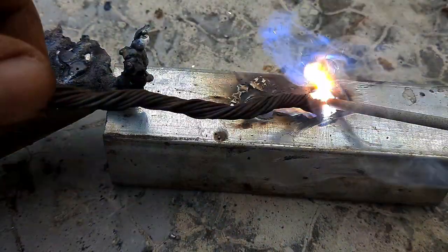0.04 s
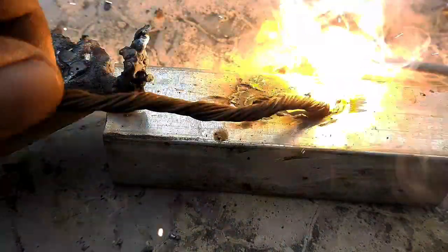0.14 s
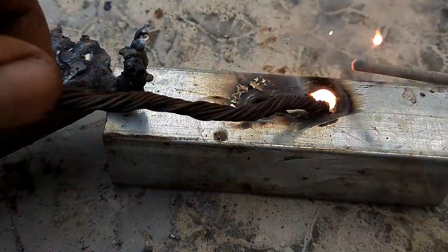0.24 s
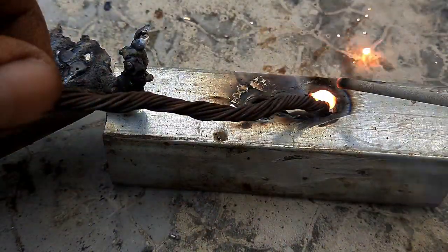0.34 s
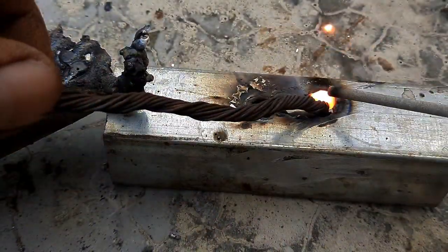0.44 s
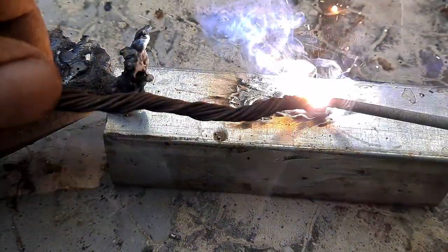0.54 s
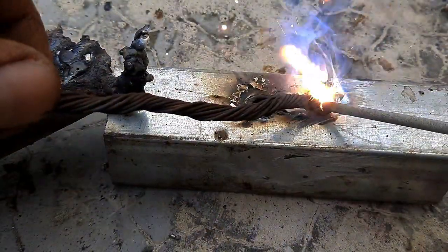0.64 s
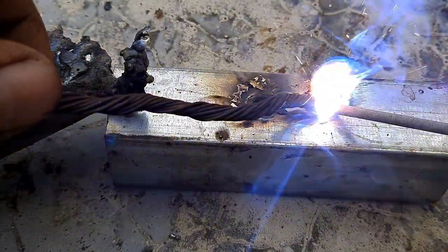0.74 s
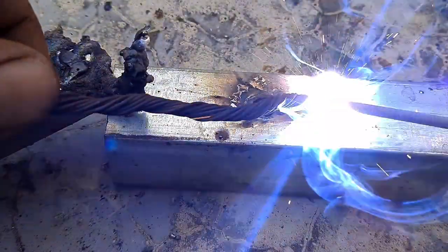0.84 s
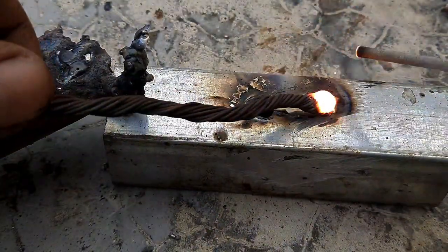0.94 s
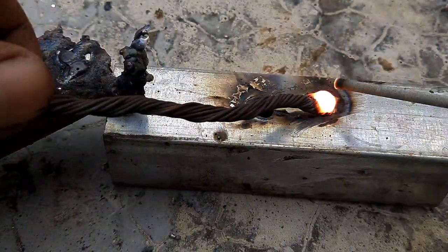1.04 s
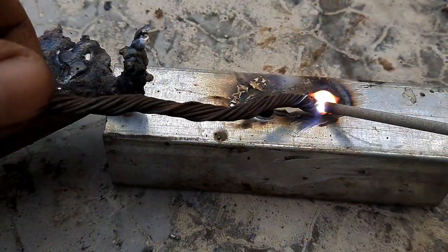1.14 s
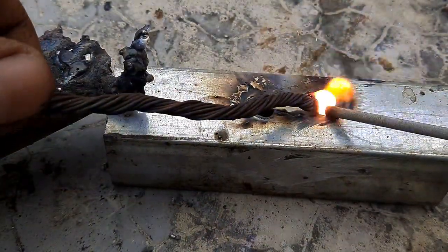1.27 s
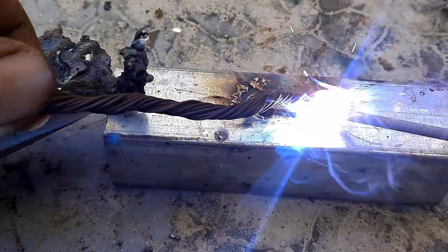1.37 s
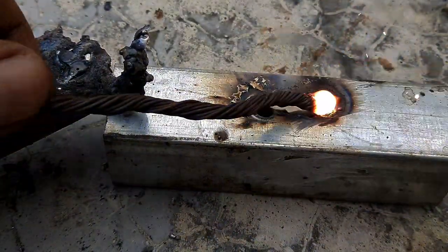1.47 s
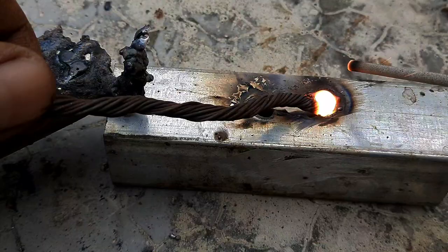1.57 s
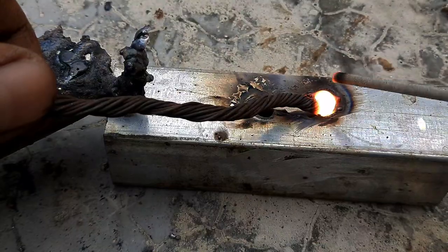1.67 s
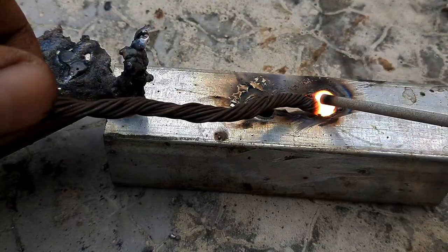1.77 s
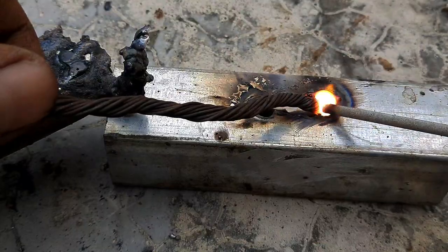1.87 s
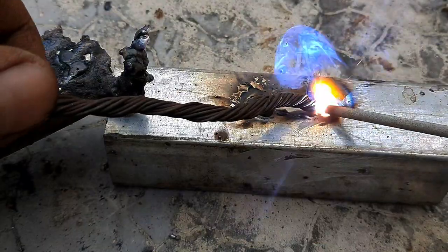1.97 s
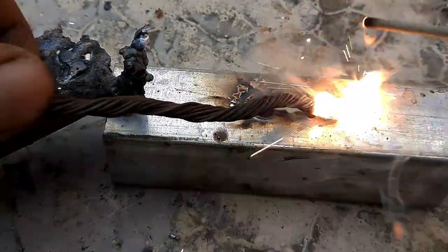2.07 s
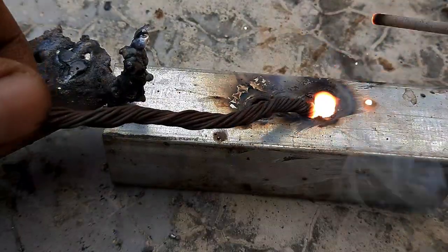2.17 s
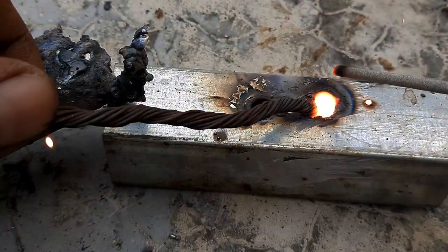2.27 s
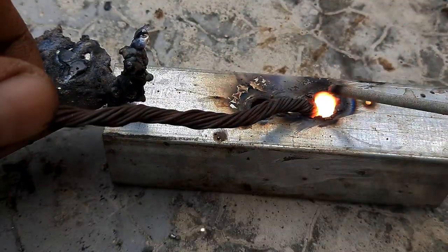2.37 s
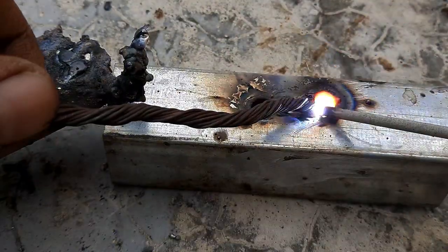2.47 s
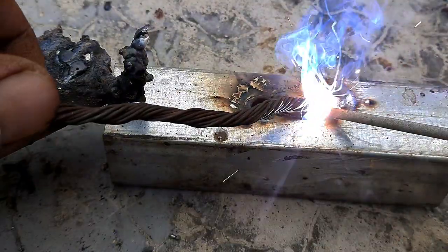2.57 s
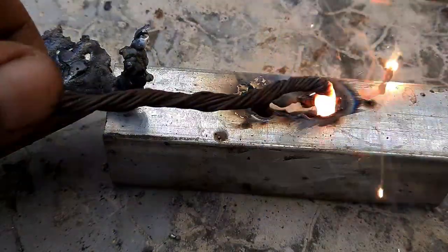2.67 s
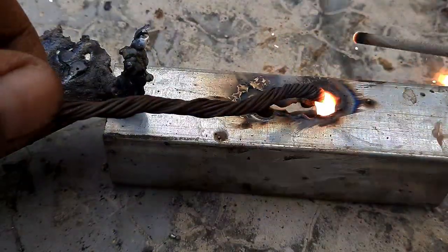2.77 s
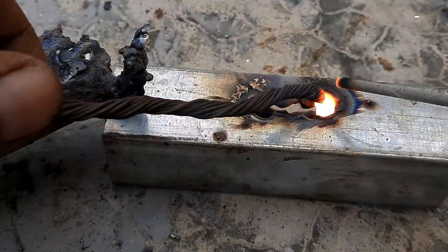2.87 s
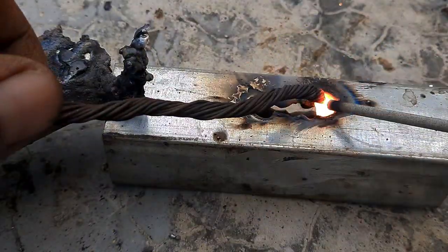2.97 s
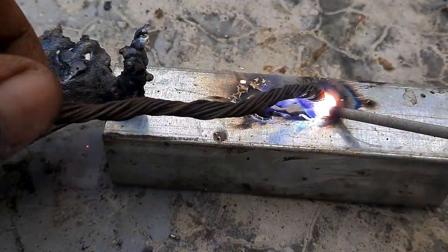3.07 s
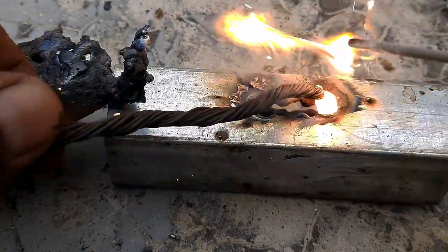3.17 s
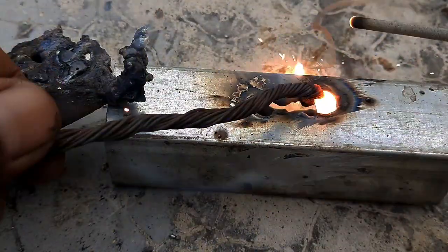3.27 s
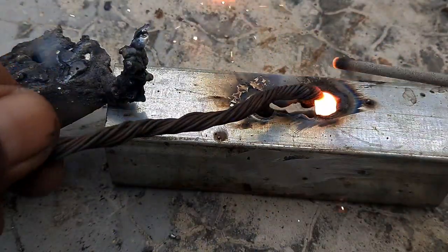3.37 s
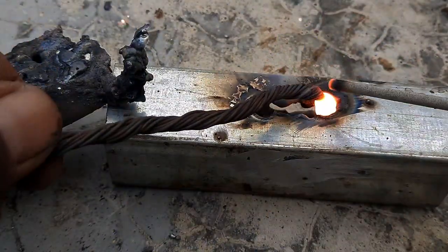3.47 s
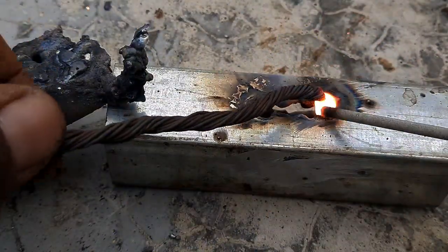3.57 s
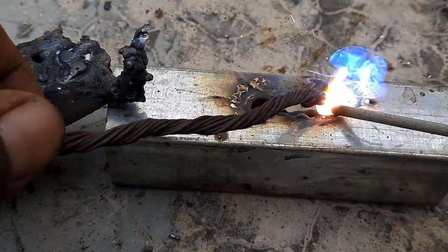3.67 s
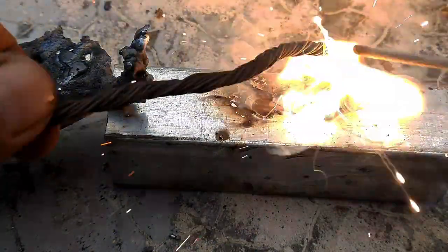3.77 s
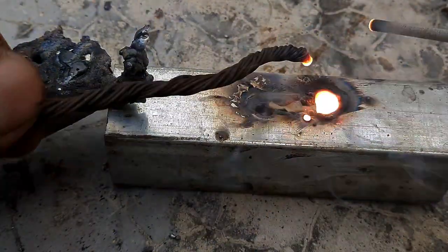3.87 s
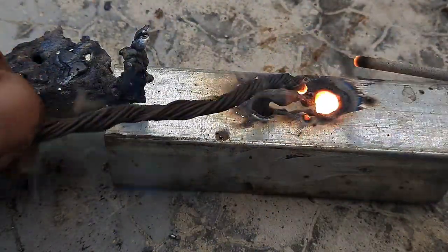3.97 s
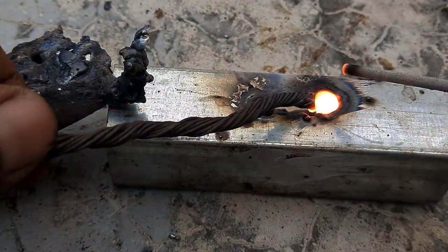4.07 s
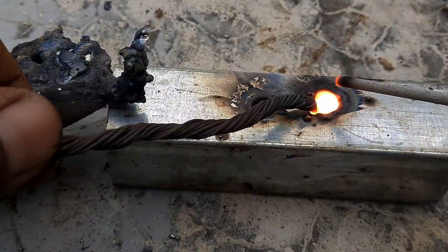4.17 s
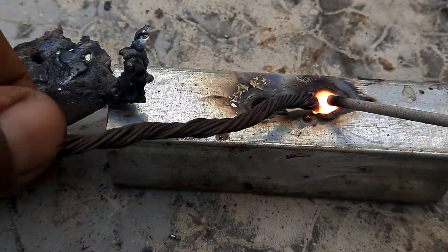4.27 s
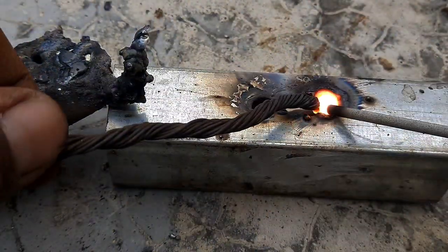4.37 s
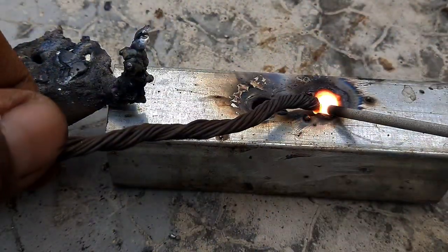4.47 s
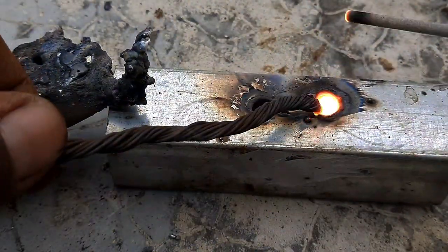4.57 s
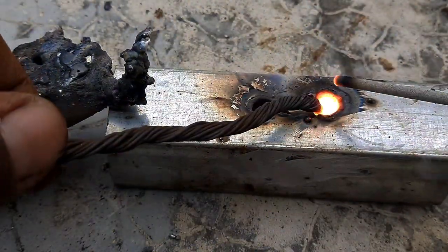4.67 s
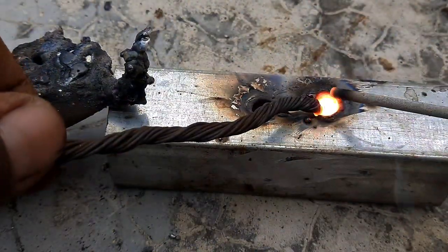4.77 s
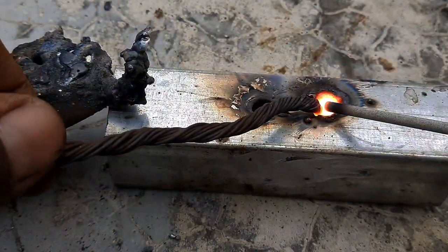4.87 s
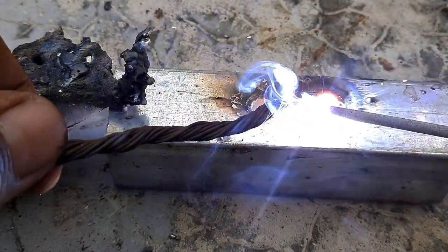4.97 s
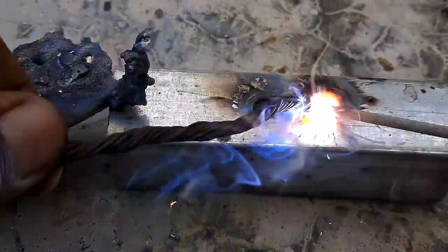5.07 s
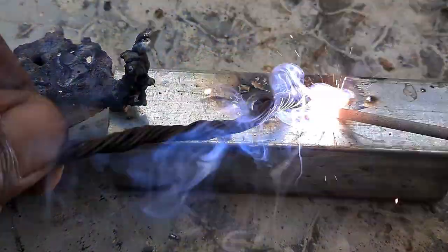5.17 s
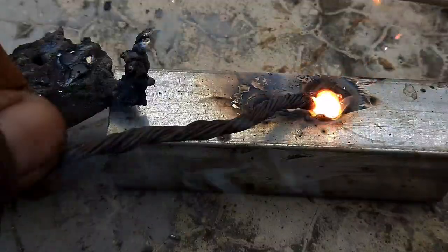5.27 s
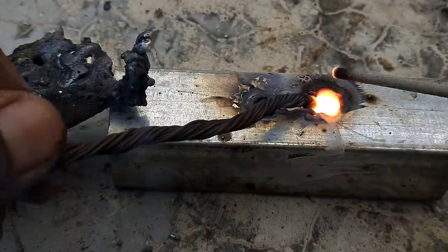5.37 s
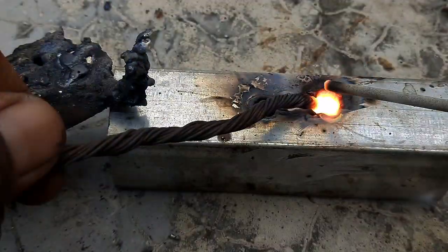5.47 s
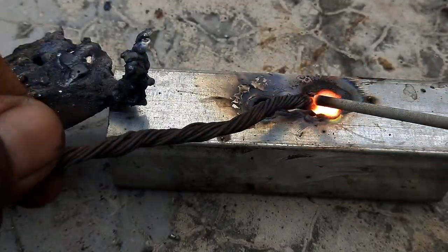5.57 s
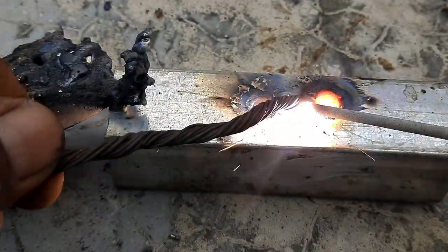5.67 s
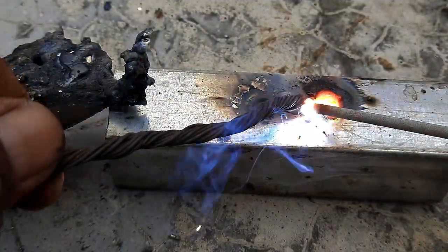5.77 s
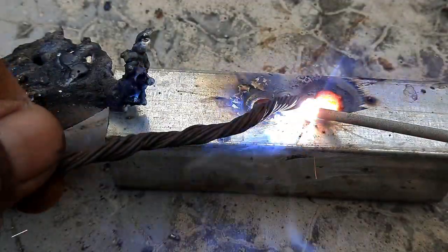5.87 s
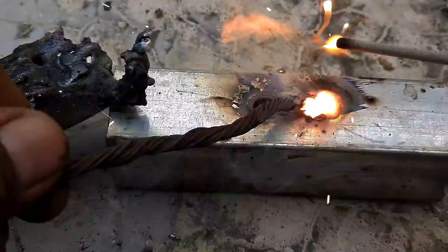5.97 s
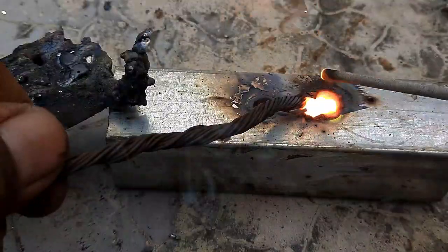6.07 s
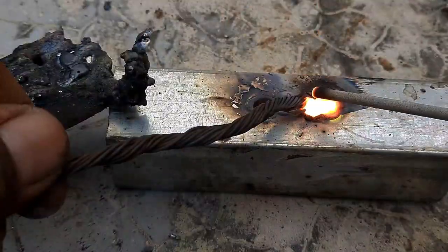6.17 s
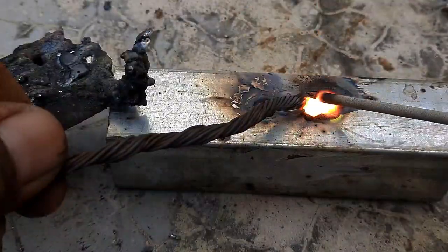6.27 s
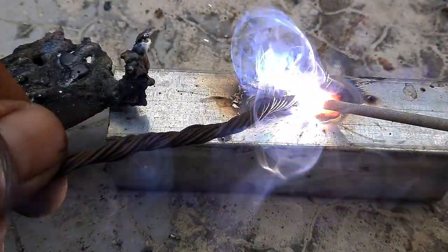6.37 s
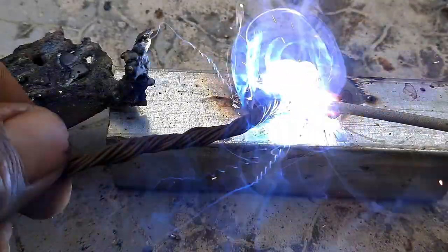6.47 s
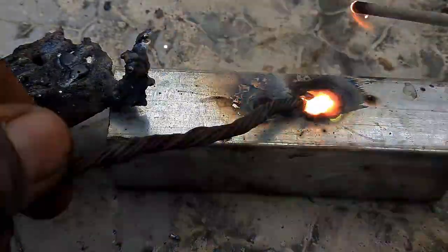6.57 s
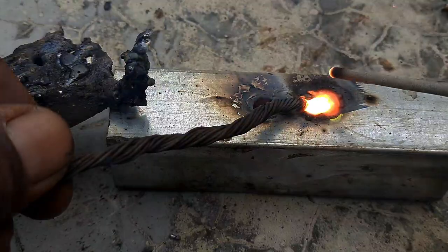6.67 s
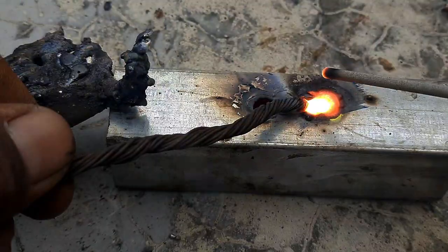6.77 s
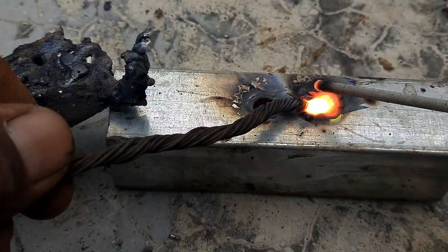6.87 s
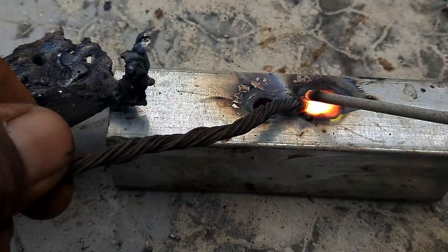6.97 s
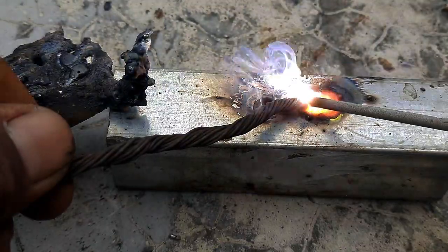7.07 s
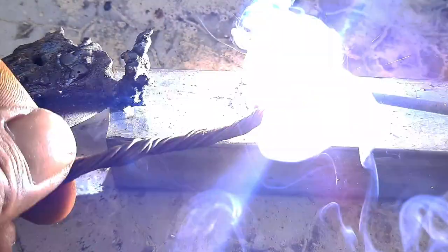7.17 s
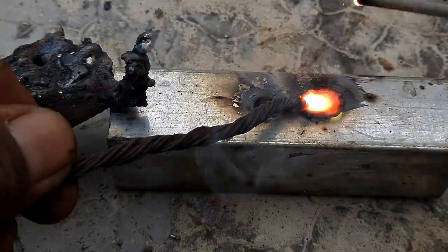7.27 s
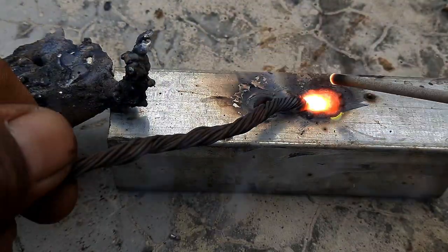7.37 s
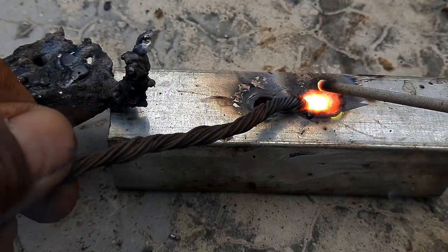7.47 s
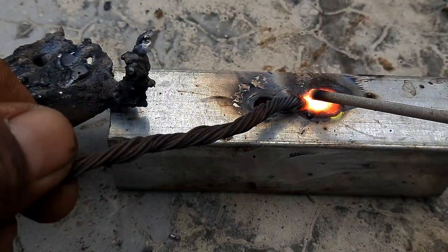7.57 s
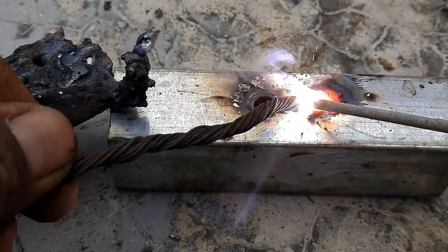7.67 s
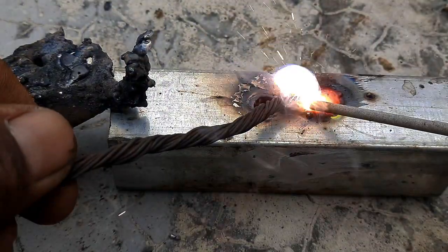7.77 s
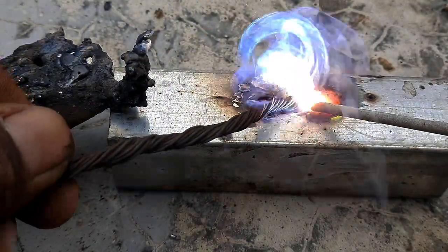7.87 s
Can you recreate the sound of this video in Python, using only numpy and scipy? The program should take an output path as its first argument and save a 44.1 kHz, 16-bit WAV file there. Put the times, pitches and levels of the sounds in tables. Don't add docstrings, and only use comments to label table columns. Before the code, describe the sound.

Close, sharp welding dabs snap, hiss and spit, each tearing off in a low gas flutter, with a droning welder fan between them.

```python
import sys
import numpy as np
from scipy import signal
from scipy.fft import rfft, irfft
from scipy.io import wavfile
from scipy.ndimage import uniform_filter1d

SR = 44100
rng = np.random.default_rng(int(sys.argv[2]) if len(sys.argv) > 2 else 0)


def volts_from_decibels(level):
    exponent = np.asarray(level, float) / 20
    return 10 ** exponent


def digitize_waveform(pressure):
    field = np.atleast_2d(pressure).T
    bounded = np.clip(field, -1, 1)
    quanta = np.round(bounded * 32767).astype(np.int16)
    wavfile.write(sys.argv[1], SR, quanta)


N = 349272
T = np.arange(N) / SR
HZ = np.fft.rfftfreq(N, 1 / SR)
DIRECT = np.array([[1], [0]])
SIDE = np.array([[1], [-1]])


def unit(x):
    return x / np.sqrt(np.mean(x ** 2))


def colour(x, points):
    hz, db = np.transpose(points)
    grid_hz = np.fft.rfftfreq(2048, 1 / SR) + 1
    log_gain = np.log(volts_from_decibels(np.interp(np.log(grid_hz), np.log(hz), db)))
    cepstrum = irfft(log_gain)
    cepstrum[1:1024] *= 2
    cepstrum[1025:] = 0
    kernel = irfft(np.exp(rfft(cepstrum)), 2048)
    kernel = kernel / np.sqrt(np.sum(kernel ** 2))
    return irfft(rfft(x) * rfft(kernel, N), N)


def band(x, hz, width_hz):
    b, a = signal.iirpeak(hz, hz / width_hz, SR)
    return signal.lfilter(b, a, x) * np.sqrt(SR / (np.pi * width_hz))


def narrow(hz, width_hz):
    slow = rng.standard_normal(len(hz)) + 1j * rng.standard_normal(len(hz))
    slow = signal.lfilter(*signal.butter(2, width_hz / 2, fs=SR), slow)
    carrier = np.exp(2j * np.pi * np.cumsum(hz) / SR)
    return unit(np.real(slow * carrier))


def walk(rate_hz):
    hold = int(SR / rate_hz)
    levels = np.repeat(rng.standard_normal(N // hold + 1), hold)
    slewed = uniform_filter1d(uniform_filter1d(levels, hold), hold)
    return unit(slewed[:N])


def impulses(s, db):
    out = np.zeros(N)
    out[(s * SR).astype(int)] = volts_from_decibels(db)
    return out


def fade(x, t60_s):
    return signal.lfilter([1], [1, -np.exp(-np.log(1000) / (t60_s * SR))], x)


def bell(s, width_s):
    out = np.zeros(N)
    near = slice(max(int((s - 4 * width_s) * SR), 0), int((s + 4 * width_s) * SR))
    out[near] = np.exp(-((T[near] - s) / width_s) ** 2)
    return out


def grainy(rate_hz, spread_db, t60_s, bed):
    hits = rng.random(N) < rate_hz / SR
    grains = hits * volts_from_decibels(spread_db * rng.exponential(size=N).clip(0, 4))
    return unit(rng.standard_normal((2, N)) * (bed + fade(grains, t60_s)))


# frequency in Hz, density in dB per Hz.
SHOP_SPECTRUM = [(25, -45), (102, -14), (223, -9.5), (416, -4), (624, -19.5), (1150, -31), (1620, -40),
                 (2550, -35.5), (3100, -47), (5600, -46), (8500, -72), (16000, -59)]


def shop():
    shop_db = -42
    mid, side = (colour(rng.standard_normal(N), SHOP_SPECTRUM) * volts_from_decibels(2.9 * walk(4.22) + 2.5 * walk(30))
                 for _ in range(2))
    side = signal.lfilter(*signal.butter(2, 800, "high", fs=SR), side)
    return volts_from_decibels(shop_db) * (mid + volts_from_decibels(6.5) * side * SIDE)


# time in seconds, level in dB.
DRONE_LEVEL = [(0, -41.5), (.2, -40), (.75, -47), (.95, -41), (1.19, -42.5), (1.45, -60), (1.78, -40),
               (2.0, -47), (2.5, -37), (2.87, -42), (3.33, -37), (4.2, -41), (4.5, -38.5), (5.25, -37.5),
               (5.7, -47.5), (6.22, -40.5), (7.4, -37), (7.78, -33)]
# frequency in Hz, width in Hz, level in dB.
HOUSING = [(430.4, 19.6, -0.5), (189, 6.4, -6.5), (326, 2.8, -18)]
# time in seconds, frequency in Hz.
WHINE_PITCH = [(0, 4810), (7.1, 4810), (7.65, 4650), (7.92, 4800)]
# time in seconds, level in dB.
WHINE_LEVEL = [(.3, -61.5), (1.1, -56.5), (1.7, -55.5), (2.3, -56), (2.9, -56.5), (3.45, -57), (4.1, -54.5),
               (4.7, -52), (5.5, -56.5), (6.2, -59.5), (6.9, -54), (7.5, -54)]


def welder():
    blade_hz = 280.3
    drone_db = np.interp(T, *np.transpose(DRONE_LEVEL))
    air_db = -47 + 0.45 * walk(3.3)
    noise = rng.standard_normal((3, N))
    phase = 2 * np.pi * np.cumsum(blade_hz + 0.5 * walk(3.0)) / SR
    tone = volts_from_decibels(drone_db - 0.5 + 1.64 * walk(12)) * np.sqrt(2) * np.sin(phase)
    drone = tone + volts_from_decibels(drone_db - 8.5) * band(noise[0], blade_hz, 26)
    air, air_side = (sum(volts_from_decibels(db) * band(v, hz, width_hz) for hz, width_hz, db in HOUSING)
                     for v in noise[1:])
    hum = drone + volts_from_decibels(air_db - 1.5) * (air + volts_from_decibels(-18) * SIDE * air_side)
    whine_db = np.interp(T, *np.transpose(WHINE_LEVEL)) + 0.93 * walk(17)
    whine = volts_from_decibels(whine_db) * narrow(np.interp(T, *np.transpose(WHINE_PITCH)), 110)
    return hum * volts_from_decibels(-0.4 * SIDE) + np.array([volts_from_decibels(-3) * np.roll(whine, -3), volts_from_decibels(3) * whine])


# start in seconds, level in dB, first half turn in seconds, length in seconds.
DRAUGHT_PUFFS = [
    (5.735, -10.5, 0.0022, 0.013),
]


def draught():
    out = np.zeros(N)
    for s, db, turn_s, length_s in DRAUGHT_PUFFS:
        t = (T - s).clip(0)
        swing = np.cos(np.pi * (t / turn_s) ** 0.56)
        out += volts_from_decibels(db) * (t > 0) * swing * np.exp(-t / length_s)
    return np.array([out, volts_from_decibels(-37) * out])


# sizzle in dB at tear-off, sizzle in dB at the next strike.
POOL_LEVELS = [(-85, -62), (-42, -70.5), (-43, -91), (-44.5, -81), (-56, -62), (-45, -58.5), (-42, -85),
               (-75, -68), (-47, -83), (-71, -61), (-43, -85), (-45, -79), (-44, -88), (-44.5, -76)]
# frequency in Hz, density in dB per Hz.
SIZZLE_SPECTRUM = [(1470, -4), (2500, 2), (3650, 0.5), (7150, 2.5), (9570, -4), (13700, -2.5),
                   (15900, -5.5), (16500, -16)]


def pool():
    sizzle_db = np.full(N, -120.0)
    for dab, after, (hot_db, cool_db) in zip(DABS, DABS[1:], POOL_LEVELS):
        tear, strike = dab[1], after[0]
        age = ((T - tear) / (strike - tear)).clip(0, 1)
        cooled = age ** 0.66
        sizzle_db = np.where(T >= tear, hot_db + (cool_db - hot_db) * cooled, sizzle_db)
    level = volts_from_decibels(sizzle_db + 0.63 * walk(25.07) + 2.0)
    return level * colour(grainy(170, 4.8, 0.016, 1.9), SIZZLE_SPECTRUM)


# start in seconds, length in seconds, frequency in Hz, width in Hz, level in dB.
SLAG_NOTES = [(3.982, 0.12, 11800, 7000, -43.5), (4.247, 0.042, 11000, 12000, -48),
              (2.759, 0.024, 6100, 13000, -36), (6.158, .03, 1010, 300, -50), (3.27, .2, 1600, 2000, -50),
              (1.48, .11, 5600, 1000, -55), (5.68, .04, 9000, 12000, -55), (6.16, .04, 2100, 200, -59),
              (3.36, .04, 2250, 200, -53), (6.81, .1, 2300, 900, -58), (7.37, .05, 1700, 1200, -56),
              (.513, .014, 5250, 400, -40), (.92, .23, 6100, 180, -54), (3.85, .1, 5080, 200, -50),
              (5.265, .2, 5300, 350, -51), (6.022, .17, 5340, 300, -51), (6.585, 0.21, 5330, 400, -50),
              (7.276, 0.28, 5430, 350, -53)]
# start in seconds, length in seconds, frequency in Hz, level in dB.
STEEL_NOTES = [
    (2.141, .27, 2940, -59),
    (3.857, .057, 3000, -53),
    (5.29, .2, 2965, -55),
    (6.158, .062, 3270, -58),
    (6.757, .22, 2940, -56),
]
# start in seconds, level in dB, start in Hz, share by which the pitch sinks.
SQUEAK_NOTES = [
    (4.46, -55, 4640, .17),
    (4.745, -56, 4150, -.12),
    (6.73, -56, 4640, .17),
    (7.43, -53, 4640, .17),
]


def singing():
    slag_sag, steel_width_hz, squeak_s, squeak_width_hz = 0.014, 90, 0.032, 130
    notes = [(*row, slag_sag) for row in SLAG_NOTES]
    notes += [(s, length_s, hz, steel_width_hz, db, 0) for s, length_s, hz, db in STEEL_NOTES]
    notes += [(s, squeak_s, hz, squeak_width_hz, db, sag) for s, db, hz, sag in SQUEAK_NOTES]
    out, flutter = np.zeros(N + SR), walk(37)
    for s, length_s, hz, width_hz, db, sag in notes:
        start = int(s * SR)
        age = (np.linspace(0, 1, SR // 3) / 3 / length_s).clip(0, 1)
        note = narrow(hz * (1 - sag * age), width_hz)
        swell = np.sin(np.pi * age ** 0.4).clip(0) ** 0.7
        level = volts_from_decibels(db - 4.5 + 1.5 * np.roll(flutter, -start)[:len(age)])
        out[start:][:len(age)] += level * note * swell
    return out[:N]


# centre in seconds, width in seconds, level in dB.
GAS_PUFFS = [(0.173, 0.0048, -26.5), (0.539, 0.0049, -28), (0.571, 0.0084, -22.5), (0.741, 0.057, -36),
             (0.898, 0.02, -24.5), (1.463, 0.014, -25), (1.938, 0.035, -37), (2.104, 0.016, -29),
             (2.702, 0.034, -24), (3.214, 0.018, -25), (3.82, 0.0095, -24), (4.544, 0.013, -22.5),
             (4.604, 0.031, -35), (5.044, 0.07, -34), (5.264, 0.031, -27.5), (5.743, 0.014, -43),
             (6.008, 0.021, -22), (6.578, 0.032, -41), (7.237, 0.03, -17), (7.746, 0.057, -37)]


def puffs():
    rumble = band(band(rng.standard_normal(N), 143, 133), 203, 285)
    out = np.zeros(N)
    for s, width_s, db in GAS_PUFFS:
        swell = np.exp(-2 * ((T - s) / (0.63 * width_s)) ** 2)
        flap = swell * rumble
        out += volts_from_decibels(db - 2.0) * flap / np.sqrt(np.sum(flap ** 2) / np.sum(swell ** 2))
    return out


# centre in seconds, level in dB.
GAS_THUMPS = [
    (.904, -40),
    (1.463, -35),
    (2.702, -35),
    (3.821, -28),
    (6.58, -28),
    (7.251, -47),
]


def thumps():
    thump_hz, width_s = 85, 0.0062
    return sum(-volts_from_decibels(db) * bell(s, width_s) * np.sin(2 * np.pi * thump_hz * (T - s))
               for s, db in GAS_THUMPS)


# start in seconds, peak in dB.
BRIGHT_SPARKS = [(0.0024, -16), (0.033, -20), (0.0504, -22), (0.1264, -15.5), (0.2528, -47), (0.3531, -41),
                 (0.391, -49), (0.5831, -23), (0.63, -14), (0.6452, -15.5), (0.6624, -19), (0.677, -17),
                 (0.7048, -28), (1.1049, -43), (1.2144, -30), (1.2218, -15), (1.2446, -29), (1.291, -19),
                 (1.3184, -23), (1.3837, -18), (1.431, -14), (1.6641, -56), (1.702, -53), (1.76, -41),
                 (1.7968, -53), (2.144, -33), (2.2794, -47), (2.404, -43), (2.5697, -12), (2.585, -17),
                 (2.6269, -12), (2.64, -13), (2.9841, -46), (3.1442, -12), (3.5423, -46), (3.587, -34),
                 (3.6711, -20), (3.9205, -46), (3.9304, -51), (4.1144, -52), (5.0414, -29), (5.055, -24),
                 (5.1176, -23), (5.1554, -18), (5.7212, -18), (5.929, -21), (5.9404, -20), (5.9554, -20),
                 (6.1115, -47), (6.3866, -27), (6.4037, -21.5), (6.451, -21), (6.6283, -48), (6.7834, -53),
                 (7.1137, -24), (7.6261, -48.5), (7.723, -20), (7.7543, -22), (7.872, -24)]
# start in seconds, peak in dB.
DULL_KNOCKS = [(0.0044, -26.5), (0.081, -25.5), (0.188, -32), (0.676, -29), (0.7256, -30), (0.762, -32),
               (0.7797, -23.5), (0.837, -35), (1.357, -27.5), (1.906, -29), (2.692, -17), (2.763, -39),
               (2.776, -46), (3.1033, -32), (3.214, -15.5), (3.3004, -34), (3.309, -36), (3.3707, -51),
               (3.3705, -32.5), (3.4382, -33), (3.7, -35), (3.7473, -22.5), (5.042, -22), (5.721, -26.5),
               (5.8483, -27.5), (5.886, -24), (6.0042, -20), (6.3426, -37), (6.4123, -38), (6.4474, -31),
               (6.8582, -38.5), (7.1335, -24), (7.793, -28), (7.81, -32), (7.8975, -34)]


def sparks():
    spit = impulses(*np.transpose(BRIGHT_SPARKS))
    knock = impulses(*np.transpose(DULL_KNOCKS))
    spray = uniform_filter1d(fade(spit, 0.0097) + volts_from_decibels(-8) * fade(spit, 0.03), size=24)
    thin = rng.standard_normal((2, N)) * spray + 3.5 * spit * DIRECT
    dull = rng.standard_normal((2, N)) * fade(knock, 0.014) + volts_from_decibels(4) * knock * DIRECT
    treble = signal.butter(2, 8500, "high", fs=SR, output="sos")
    return volts_from_decibels(-1.5) * signal.sosfilt(treble, thin) + volts_from_decibels(-2) * band(dull, 1350, 1200)


# peak in dB, body over crack in dB.
ROD_STRIKES = [(-36, -1), (-12, 14), (-26, -32), (-24.5, -6), (-19, -8), (-28, 5), (-29, 0), (-45, -10),
               (-18, 4), (-32, -26), (-40, -8), (-26, -10), (-16, 9), (-10, 3), (-23.5, 19)]
# start in seconds, peak in dB, body over crack in dB.
SHORT_CIRCUITS = [(0.0333, -25, -1), (0.0685, -31, -3), (0.1277, -27, 5), (0.1702, -20.5, 14.5),
                  (0.735, -26, 3), (0.7942, -20, -11), (0.8977, -18, 7.5), (1.1931, -17, -6),
                  (1.3189, -15.5, 0.5), (1.386, -28, -10), (1.917, -18.5, -5.5), (1.949, -20, -23),
                  (2.0492, -13, 1), (2.106, -16.5, 11.5), (2.563, -23, -2), (2.6403, -35, -10),
                  (3.203, -18, -11), (3.684, -6.5, -7.5), (3.7014, -9.5, -23), (3.8205, -26, 15),
                  (4.3709, -9, -3.5), (5.118, -18, -5), (5.9297, -23.5, -3), (6.387, -22, -4),
                  (7.1566, -21.5, 0), (7.1717, -18, 1), (7.184, -17, -4), (7.2068, -13.5, -12),
                  (7.2261, -25, 18), (7.241, -22, -16)]
# start in seconds, peak in dB.
SMALL_SPITS = [(.5974, -17), (0.6214, -14.5), (0.6455, -23), (0.681, -20), (.7062, -25), (1.223, -18),
               (1.272, -25), (1.3106, -25), (1.3665, -18.5), (1.87, -23), (1.879, -23), (2.07, -14),
               (2.57, -24), (2.5867, -29), (3.137, -20), (3.1452, -23), (3.6332, -19), (3.6497, -22),
               (3.7232, -18), (4.379, -18), (4.8217, -20), (4.8292, -16), (5.0429, -10), (5.111, -21),
               (5.156, -22), (5.781, -19), (6.4913, -30), (7.809, -23.5), (7.8736, -19), (7.88, -19),
               (1.432, -16.5), (0.7092, -25), (.8395, -36), (5.789, -22),
               (0.0002, -32), (0.0076, -29), (0.0337, -25), (0.0706, -24), (0.1707, -10.5), (0.534, -31),
            (0.6306, -27), (0.6487, -31), (0.6627, -28), (0.7072, -26), (0.7095, -27), (0.7361, -24),
            (0.7388, -25), (1.1791, -23), (1.2961, -29), (1.3675, -16), (1.3713, -27), (1.8714, -24),
            (1.8813, -27), (2.0452, -19), (2.5305, -23), (2.5865, -24), (2.6833, -16), (3.065, -23),
            (3.1168, -33), (3.1485, -24), (3.154, -22), (3.632, -26), (3.779, -15), (3.7862, -14),
            (4.96, -23), (4.9712, -25), (4.9827, -25), (5.048, -24), (5.056, -23), (5.151, -23),
            (5.1634, -23), (5.2623, -18), (5.7817, -27), (5.9448, -27), (6.4902, -17), (6.5172, -27),
            (6.534, -19), (6.558, -27), (7.1149, -32), (7.1509, -20), (7.172, -21), (7.236, -24),
            (7.2466, -21), (7.7003, -32), (7.7554, -24), (7.789, -23), (7.8063, -33), (7.8476, -24),
            (7.8853, -25), (7.8985, -19.5)]


def droplets():
    strikes = [(dab[0], *row) for dab, row in zip(DABS, ROD_STRIKES)]
    small = [(s, db, -8.5) for s, db in SMALL_SPITS]
    return np.transpose(strikes + SHORT_CIRCUITS + small)


def mottle(x, low_db, high_db):
    low = signal.lfilter(*signal.butter(1, 7000, fs=SR), x)
    return volts_from_decibels(low_db) * low + volts_from_decibels(high_db) * (x - low)


# frequency in Hz, density in dB per Hz.
HISS_SPECTRUM = [(590, -17), (1000, -6.5), (1610, -6), (1820, 1), (2090, -13), (2280, -4), (2620, -6),
                 (2980, -4.5), (5250, 0.5), (8550, -2), (9720, -8), (12100, -3), (15300, -6)]
# start in seconds, peak in dB.
SLAG_TICKS = [(.222, -34), (.308, -35), (2.431, -34.5), (2.8834, -32.5), (3.372, -35), (3.4375, -33),
              (3.5984, -31), (7.666, -26), (0.33, -40), (0.4145, -40), (1.115, -40), (1.767, -35.5),
              (2.495, -33), (2.927, -33), (3.003, -36), (3.3, -31), (3.49, -33), (5.6478, -40),
              (6.7054, -49), (6.7196, -43), (6.736, -41), (6.771, -45), (6.808, -42), (6.8453, -45),
              (6.8628, -49), (6.8802, -37), (6.9082, -42), (6.9287, -44), (6.9551, -43), (7.5352, -41)]


def snaps():
    s, db, body_db = droplets()
    crack, body = impulses(s, db), impulses(s, db + body_db)
    tick = impulses(*np.transpose(SLAG_TICKS))
    shock = 9 * (crack - 0.55 * np.roll(crack, 2)) * DIRECT
    crack_spray = volts_from_decibels(-13) * fade(crack, 0.0018) + volts_from_decibels(-15.5) * fade(crack, 0.018)
    spray = uniform_filter1d(crack_spray + volts_from_decibels(-1.5) * fade(tick, 0.016), size=12)
    high = colour(shock + rng.standard_normal((2, N)) * spray, HISS_SPECTRUM)
    low = rng.standard_normal((2, N)) * volts_from_decibels(0.5) * fade(body, 0.0064) + volts_from_decibels(7.5) * body * DIRECT
    knock = band(low, 1200, 2000) + volts_from_decibels(-5.5) * band(low, 530, 370)
    return volts_from_decibels(-4) * mottle(high, 1 + walk(70), walk(70) - 3) + volts_from_decibels(-6.5) * knock


# strike in seconds, tear-off in seconds, hiss in dB once struck,
# hiss in dB before tearing off, roar in dB at tear-off.
DABS = [(0, 0.182, -35, -31.5, -32), (0.5328, 0.899, -22, -28, -21), (1.1785, 1.456, -37, -29, -25.5),
        (1.864, 2.103, -33.5, -29.5, -22.5), (2.5266, 2.695, -44, -26, -22.5),
        (3.0628, 3.211, -34, -30.5, -24), (3.623, 3.814, -32, -27, -17.5), (4.365, 4.393, -38, -48, -50),
        (4.5322, 4.545, -52, -39.5, -29.5), (4.824, 4.826, -43, -36.5, -52),
        (4.947, 5.258, -22.5, -29.5, -19.5), (5.725, 6.009, -36.5, -32.5, -24.5),
        (6.3353, 6.564, -37, -28.5, -24.5), (7.058, 7.244, -28.5, -31.5, -16),
        (7.686, 7.965, -32, -34, -39)]
# centre in seconds, width in seconds, hiss change in dB.
HAND_WAVERS = [(0.177, 0.005, -37), (.66, 0.15, -8), (0.692, 0.007, -6), (.794, 0.0098, 2.5),
               (1.206, 0.016, -7.5), (1.246, 0.0084, 2.5), (1.898, 0.011, -9.5), (1.94, 0.035, -3),
               (1.985, 0.0074, -10), (2.541, 0.0097, 4), (2.615, 0.016, 8), (3.678, 0.024, -6.5),
               (3.735, 0.015, -1), (4.947, 0.0047, -10), (4.989, 0.0055, -8), (5.039, 0.0052, -8),
               (5.061, 0.017, 7.5), (5.925, 0.0037, 2), (6.545, 0.024, 1), (2.6, .006, -2),
               (0.859, 0.0091, -3.5), (1.45, 0.009, -0.5), (5.102, 0.072, -2.5), (5.178, 0.0086, 3.5),
               (5.757, 0.014, -6), (5.785, 0.012, 3.5), (5.906, 0.011, -4.5), (5.94, 0.049, 2.5),
               (6.409, 0.015, 3.5), (6.435, 0.013, -4.5), (6.458, 0.047, 6), (7.174, 0.0053, 4.5),
               (7.736, 0.0042, -10), (7.75, 0.0078, -5), (7.774, 0.013, -5), (7.795, 0.057, 6)]


def burning():
    flash_db, flash_s = 5.5, 0.0061
    stretch_db, stretch_s = 7.5, 0.046
    swell_db_per_s, hiss_quench_db_per_s, roar_quench_db_per_s = 485, 1120, 1302
    hiss_db, roar_db = np.full((2, N), -120.0)
    waver_db = sum(db * bell(s, width_s) for s, width_s, db in HAND_WAVERS)
    for strike, tear, early_db, late_db, tear_db in DABS:
        since, left = T - strike, tear - T
        build = (since / (tear - strike)).clip(0, 1)
        steady = early_db + (late_db - early_db) * build + waver_db
        flash = flash_db * np.exp(-since.clip(0) / flash_s)
        stretch = stretch_db * np.exp(-left.clip(0) / stretch_s)
        roar = np.maximum(steady - 11.5, tear_db - swell_db_per_s * left.clip(0))
        overrun = left.clip(None, 0)
        hiss = steady + flash + stretch + hiss_quench_db_per_s * overrun
        hiss_db = np.where(since >= 0, hiss, hiss_db)
        roar_db = np.where(since >= 0, roar + roar_quench_db_per_s * overrun, roar_db)
    return hiss_db.clip(-120), roar_db.clip(-120)


# treble over middle in dB once struck, before tearing off.
DAB_SHEEN = [(2, -1.5), (2.5, -0.5), (8, -1), (6.5, -1.5), (6, -0.68), (7, 3.3), (5.5, -1.7), (-3, -0.36),
             (22, -1.5), (13, 9), (0, 1.8), (-1.5, -0.7), (-2, -0.5), (-2, -0.5), (-0.5, 5)]


def sheen():
    s = [t for dab in DABS for t in dab[:2]]
    return np.interp(T, s, np.ravel(DAB_SHEEN))


# frequency in Hz, width in Hz, swing in dB.
COLOUR_DIPS = [(2600, 1000, 4), (7400, 1200, 5), (9600, 1200, 4)]


def dance(x):
    for hz, width_hz, db in COLOUR_DIPS:
        change = volts_from_decibels(db * walk(18) - db / 2) - 1
        x = x + change * signal.lfilter(*signal.iirpeak(hz, hz / width_hz, SR), x)
    return x


# frequency in Hz, density in dB per Hz.
ROAR_SPECTRUM = [(150, -15.5), (250, -6.5), (679, 1), (834, -7), (1190, -1), (1860, -16), (2100, -24),
                 (2600, -16), (3380, -27), (5720, -120)]
# centre in seconds, width in seconds, roar in dB.
GAS_FLARES = [(.56, .015, -31), (0.186, 0.0024, -25), (.74, .04, -73), (2.095, 0.013, -47),
              (2.69, 0.015, -22.5), (.172, 0.0056, -24), (3.211, 0.013, -24), (4.375, 0.0055, -59),
              (7.69, 0.0051, -36), (1.369, 0.019, -65), (1.937, 0.0069, -26.5), (3.075, 0.025, -44),
              (4.534, 0.011, -39), (4.821, 0.0041, -28), (4.95, 0.015, -42), (5.015, 0.012, -32),
              (5.057, 0.021, -26), (5.785, 0.029, -48), (5.884, 0.017, -36.5), (6.36, 0.3, -48),
              (7.075, 0.049, -37), (7.705, 0.0063, -36)]


def arc():
    hiss_db, roar_db = burning()
    flares = sum(volts_from_decibels(db) * bell(s, width_s) for s, width_s, db in GAS_FLARES)
    gas = volts_from_decibels(roar_db) + (hiss_db > -70) * flares
    spit = grainy(500, 1.6, 0.0025, 0.9) + volts_from_decibels(-19) * grainy(90, 1.5, 0.0012, 0)
    plasma = dance(colour(spit, HISS_SPECTRUM))
    hiss = mottle(plasma, 1.6 * walk(50) - sheen(), 1.6 * walk(50) + sheen())
    roar = colour(grainy(200, 3.6, 0.0065, 0.58), ROAR_SPECTRUM)
    return hiss * volts_from_decibels(hiss_db - 2.0 + 1.55 * walk(120)) + roar * gas * volts_from_decibels(-3.5 + 2.9 * walk(80))


# frequency in Hz, left lead in radians before,
# after, left minus right in dB before, after.
PORT_POSES = [(0, 0, 0, -1, -1), (1300, .4, .4, -2.5, -2.5), (2300, 1.7, 1.3, 3.5, 0),
              (3000, .3, 1.1, 1, 1), (4800, 1.6, 2.2, 2, 2), (5400, 1.2, 1.7, -4, -2),
              (6500, 2, 2.9, -5, -3), (7800, 3.2, 2.7, -8, -3), (8800, 3.4, 2.2, -6, -10),
              (9700, 3.8, 5.6, 0, 1), (11200, 5, 5.6, 4, 0), (12500, 4.4, 6, 5, 3), (13300, 3.9, 4.1, 1, 1),
              (13900, 6.3, 5.8, 5, -2), (14700, 5.8, 3.2, 1, -3), (16600, 5.6, 3, 2, 0)]
TIP_S = (3.9, 4.9)


def ports(direct, scattered):
    scattered = volts_from_decibels(-6) * signal.lfilter(*signal.butter(1, 1700, "high", fs=SR), scattered)
    left, right = rfft(direct + scattered), rfft(direct - scattered)
    hz, *pose = np.transpose(PORT_POSES)
    views = []
    for k in range(2):
        lead, difference_db = np.interp(HZ, hz, pose[k]), np.interp(HZ, hz, pose[k + 2])
        half = volts_from_decibels(difference_db / 2) * np.exp(0.5j * lead)
        views.append(np.array([irfft(left * half, N), irfft(right / half, N)]))
    before, after = views
    return before + np.interp(T, TIP_S, [0, 1]) * (after - before)


def walls(x, t60_s, db):
    t = T[:SR // 4]
    tails = rng.standard_normal((2, len(t))) * np.exp(-np.log(1000) * t / t60_s)
    tails /= np.sqrt(np.sum(tails ** 2, axis=1, keepdims=True))
    return volts_from_decibels(db) * signal.fftconvolve(x[None], tails, axes=1)[:, :N]


def scene():
    background = shop() + welder() + draught()
    direct, scattered = pool() + sparks() + snaps() + arc()
    near = direct + singing() + puffs() + thumps()
    return ports(near, scattered) + walls(direct, 0.065, -22) + background


def low_pass(x):
    return signal.sosfilt(signal.butter(12, 17030, fs=SR, output="sos"), x)


def record(dry):
    rounded = 0.75 * np.tanh(dry / 0.97)
    top = signal.ellip(10, 0.2, 75, 15750, fs=SR, output="sos")
    mix = signal.sosfilt(top, rounded)
    return low_pass(mix)


dry = scene()
out = record(dry)
digitize_waveform(out)
```